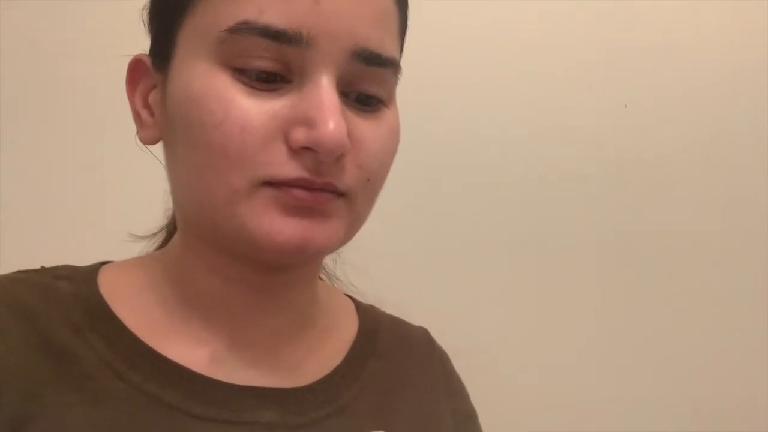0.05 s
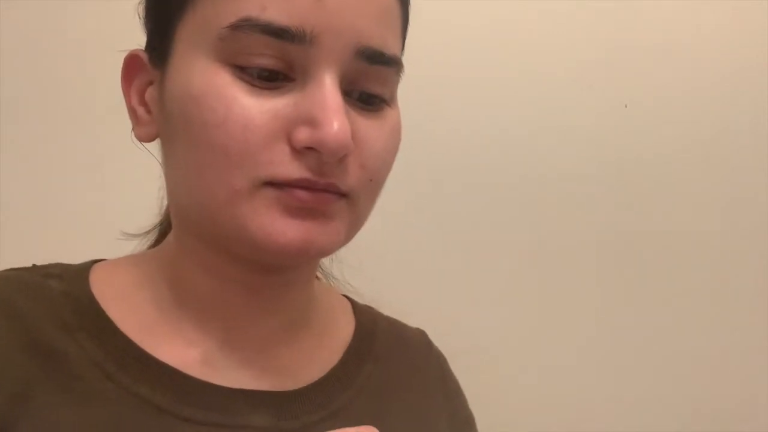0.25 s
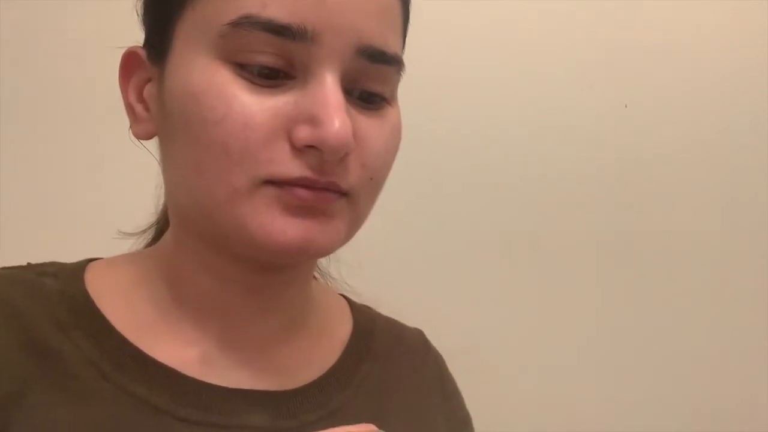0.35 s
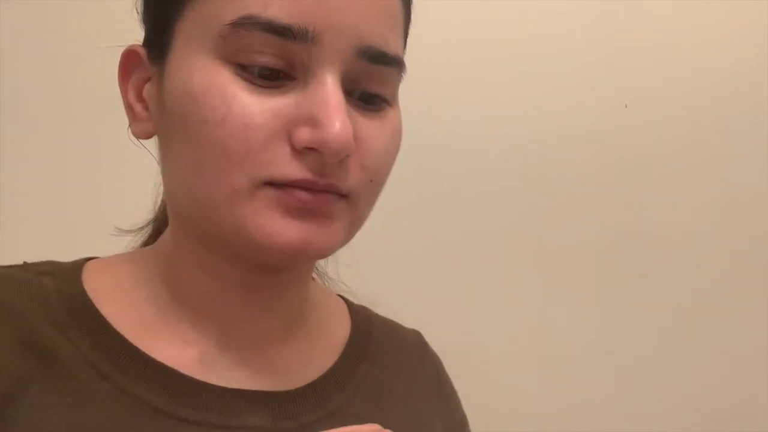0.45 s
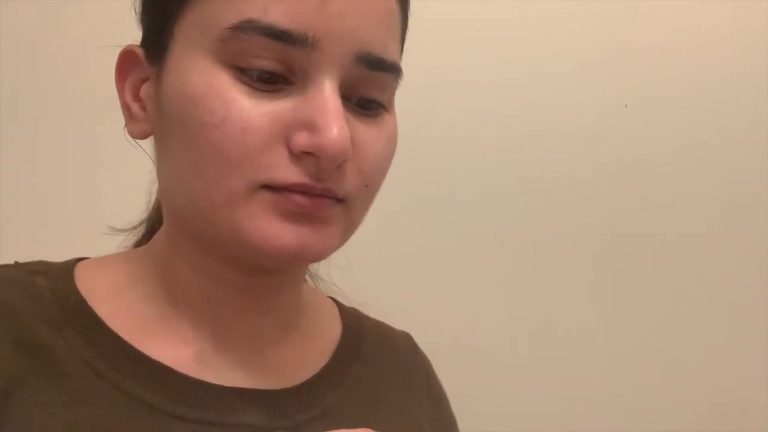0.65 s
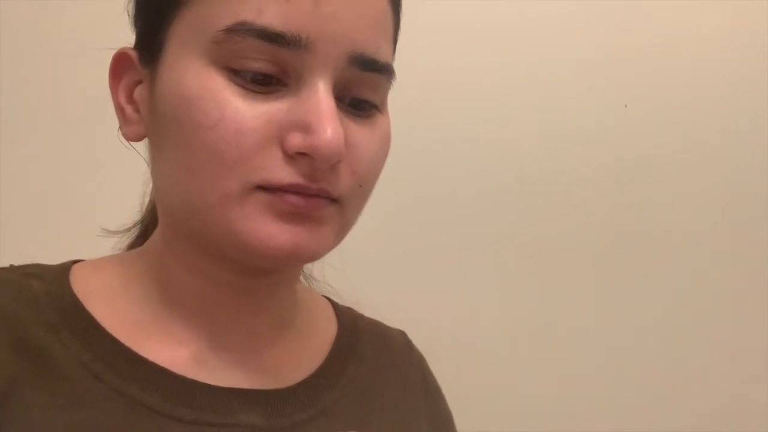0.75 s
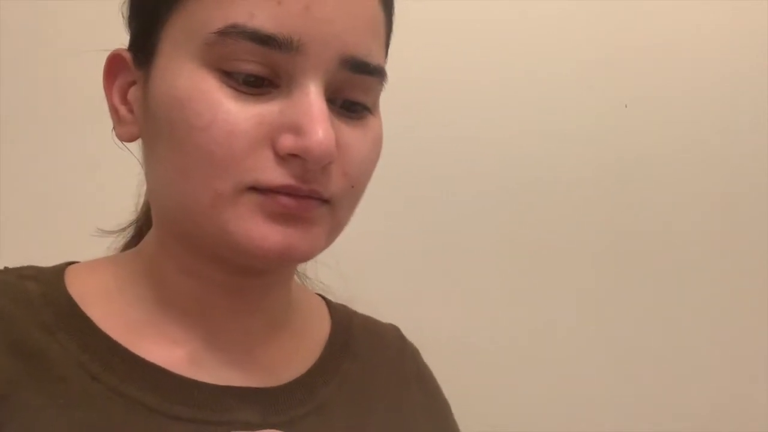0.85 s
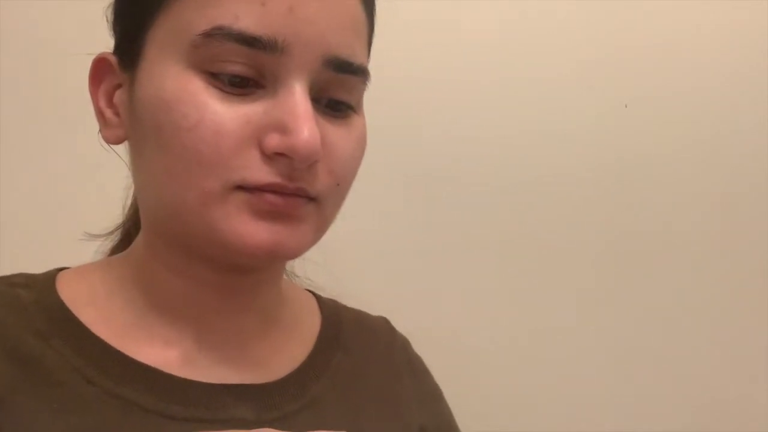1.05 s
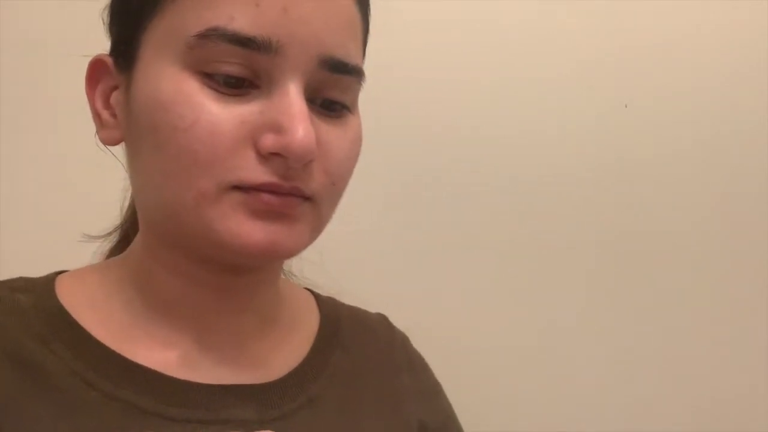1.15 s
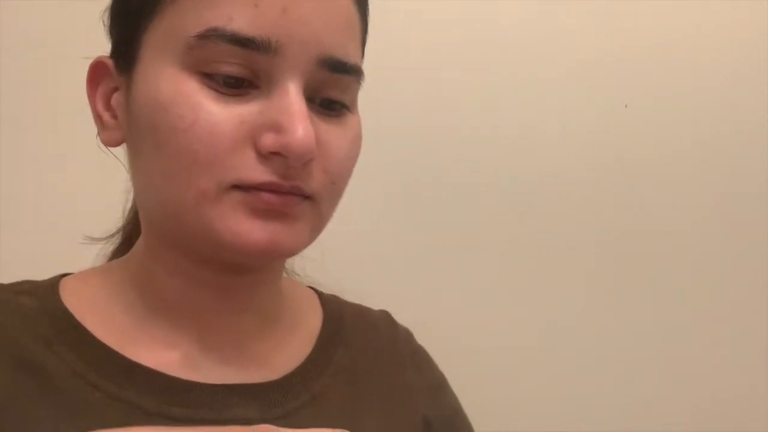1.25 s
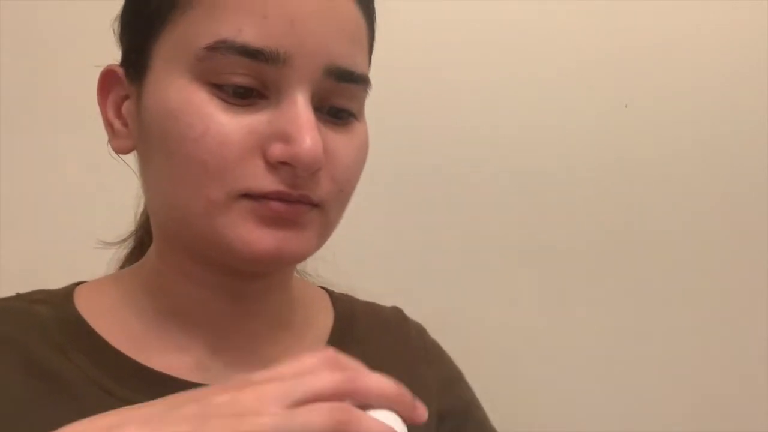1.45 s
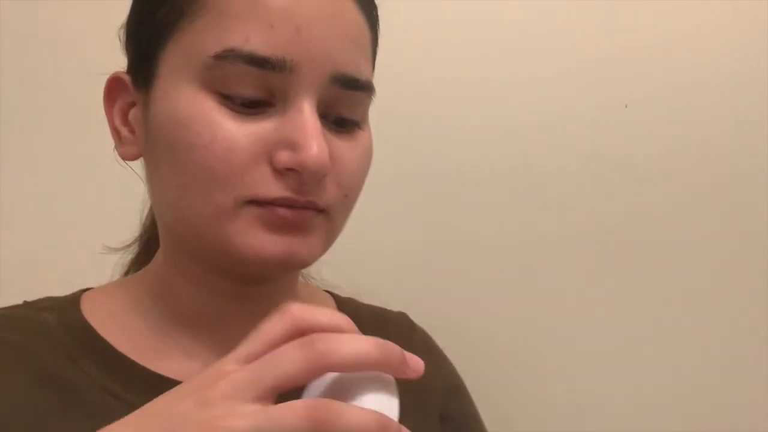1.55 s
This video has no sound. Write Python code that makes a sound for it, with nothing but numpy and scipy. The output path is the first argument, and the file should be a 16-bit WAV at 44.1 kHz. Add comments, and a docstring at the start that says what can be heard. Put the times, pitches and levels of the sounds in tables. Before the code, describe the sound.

A small jar's screw lid is handled close up in a small, quiet room. Faint scraping grows to clicks and a dull table bump around 0.25-0.32 s. Gritty thread scraping continues; a brighter click with a brief ring and low thud comes at 0.5 s. A finger hisses softly over the side around 0.75-0.95 s, then small dry clicks at 1.16-1.19 s fade into faint hum and hiss.

```python
"""The lid of a small cream jar clicks and scrapes on its thread, close to a phone in a small bare room.
Each click rings the modes (natural tones) of jar and lid; the scrape is a dense run of tiny slips.
The jar bumps a table top, which answers with low, short rings.
A finger slides over the smooth side, made of filtered noise; a low hum and hiss lie below."""
import sys
import numpy as np
from scipy import signal
from scipy.fft import rfft, irfft
from scipy.io import wavfile

SR = 44100
rng = np.random.default_rng(int(sys.argv[2]) if len(sys.argv) > 2 else 0)


def boost_factor(decibels):
    """Convert a level in decibels to a linear amplitude factor."""
    exponent = np.asarray(decibels, float) / 20
    return 10 ** exponent


def unload_audio(sound):
    """Save the sound as a 16-bit wav file, at the path given as the first command line argument."""
    columns = np.transpose(np.atleast_2d(sound))
    # keep every value between -1 and 1, then stretch to whole-number steps
    steps = np.round(np.clip(columns, -1, 1) * 32767)
    wavfile.write(sys.argv[1], SR, steps.astype(np.int16))


N = 70560  # samples: 1.6 s

# modes of jar and lid: pitch_hz, level_db (relative), t60_s (time to fade by 60 dB)
JAR_MODES = [(707, -9.5, 0.038), (889, -5, 0.034), (1198, 3, 0.016), (1316, -2.5, 0.029), (1620, 2.5, .005),
             (1944, 3, 0.0043), (2540, -2.5, 0.0032), (3836, 2.5, 0.0042), (4940, 2.5, 0.005),
             (5500, -1, 0.021), (6210, -3.5, 0.0068), (9070, -7, 0.0054), (12600, 3.5, 0.0024),
             (1103, -10, 0.48), (1140.6, -9.5, 0.43), (1267, -22, 0.39), (2043, -37, 0.066),
             (2552, -11, 0.16), (3373, -10, 0.21), (3460, -12, 0.17)]


def rms_one(x):
    """Scale a sound to an average (rms) strength of 1."""
    return x / np.sqrt(np.mean(x ** 2) + 1e-20)


def in_time(rows):
    """Turn a table whose first column is time into smooth curves, one value per sample."""
    time_s, *columns = np.transpose(rows)
    return [np.interp(np.arange(N) / SR, time_s, column) for column in columns]


def at_hz(points, hz):
    """Read a table at a pitch, on a log-frequency axis as the ear hears it."""
    table_hz, table_db = np.array(points).T
    return np.interp(np.log(hz), np.log(table_hz), table_db)


def colour(x, spectrum, turn=1):
    """Filter x by a curve in dB; turn=1j also shifts every wave by a quarter cycle."""
    hz = np.fft.rfftfreq(N, 1 / SR) + 1
    return irfft(turn * rfft(x) * boost_factor(at_hz(spectrum, hz)), N)


def drift(rate_hz):
    """Slow random wandering of spread 1: noise smoothed twice."""
    r = np.exp(-2 * np.pi * rate_hz / SR)
    noise = rng.standard_normal(N + SR)
    return rms_one(signal.lfilter([1], [1, -2 * r, r * r], noise)[SR:])


def ring(hits, hz, t60_s):
    """A resonator: a hit of size 1 starts a fading sine of height 1."""
    r = boost_factor(-60 / (max(t60_s, 0.001) * SR))
    w = 2 * np.pi * hz / SR
    return signal.lfilter([0, np.sin(w)], [1, -2 * r * np.cos(w), r * r], hits + 1e-18)


def lowpass(x, hz):
    """Soften everything above hz with a gentle second-order filter."""
    return signal.lfilter(*signal.butter(2, hz, fs=SR), x)


def bandpass(x, low_hz, high_hz):
    """Keep the range between two pitches."""
    return signal.sosfilt(signal.butter(2, [low_hz, high_hz], "band", fs=SR, output="sos"), x)


def lid_clicks():
    """Each click strikes every jar mode with its own colour and damping; low modes swell more slowly."""
    # clicks of lid on jar: start_s, grip_t60_s (longest ring the grip allows),
    # then one strength_db for each pitch in click_bands_hz
    click_rows = [(0.2519, 0.05, -13.5, -28, -20.5, -14.5, -31, -27.5, -14),
                  (0.2919, 0.075, -21, -27, -54, -67, -64, -70, -65),
                  (0.3164, 0.025, -5, -24, -9.5, -14, -24.5, -16, -11),
                  (0.5067, 0.045, -17.5, -46, -31, -32, -26, -44, -60),
                  (0.5112, 0.29, -11.5, -15.5, -2.5, -21.5, -17.5, -26.5, -11.5),
                  (0.5133, 0.095, -46, -12, -40, -50, -23, -29.5, -60),
                  (1.1565, 0.016, -21.5, -30.5, -45, -26, -59, -46, -77),
                  (1.1926, 0.017, -16.5, -22.5, -28, -34, -25.5, -24, -82)]
    # pitches at which the click strengths are given: pitch_hz
    click_bands_hz = [900, 1250, 2000, 2600, 3500, 5600, 12000]
    build_cycles, contact_s, build_share = 1.5, 0.00023, 0.033  # the longest of three build-up times counts
    waver_db, waver_hz = 1.5, 25  # long rings waver in the fingers
    out = np.zeros(N + SR)
    t = np.arange(SR // 2) / SR
    for start_s, grip_t60_s, *tone_db in click_rows:
        for hz, level_db, t60_s in JAR_MODES:
            build_s = max(build_cycles / hz, contact_s, build_share * min(t60_s, grip_t60_s))
            # damping by the grip adds to the mode's own
            fade = boost_factor(-60 * t * (1 / t60_s + 1 / max(grip_t60_s, 0.005)))
            envelope = np.minimum(t / build_s, 1) * fade
            waver = waver_db * drift(waver_hz)[:len(t)] * np.minimum(t * waver_hz, 1) * (t60_s > 0.1)
            strike_db = np.interp(np.log(hz), np.log(click_bands_hz), tone_db)
            strength = boost_factor(level_db + waver + strike_db)
            # random starting point in the cycle, more so for high modes
            phase_cycles = rng.normal(0, 1) / 10 * np.sqrt(hz / 1500)
            tone = np.sin(2 * np.pi * (hz * t + phase_cycles))
            out[int(start_s * SR):][:len(t)] += strength * envelope * tone
    return out[:N]


def thread():
    """Dense uneven slips sound the hollow under the lid and the jar's modes; a rumble passes into the hand."""
    # lid on thread: time_s, scrape_db, bright_db, rumble_db
    turn_rows = [(0, -118, -81, -65.5), (.07, -58.5, -67.5, -57), (.15, -47, -57, -51.5),
                 (.21, -49.5, -54, -55), (.27, -39, -45.5, -47.5), (.34, -42.5, -39, -40.5),
                 (.4, -43, -47, -46), (.45, -44.5, -66, -41.5), (.49, -47, -47.5, -43.5),
                 (.6, -43, -41, -43), (.68, -49, -92, -64.5), (.75, -57.5, -77, -49.5),
                 (.82, -52, -91, -46.5), (.9, -49, -50, -54), (.97, -58.5, -51.5, -56),
                 (1.1, -54.5, -53.5, -51.5), (1.14, -55, -57.5, -55), (1.165, -46, -42.5, -41.5),
                 (1.19, -95, -48.5, -45), (1.25, -91, -51.5, -50.5), (1.31, -66, -73, -62),
                 (1.6, -64.5, -83, -62.5)]
    # pitch of the hollow under the lid: time_s, pitch_hz
    hollow_rows = [(0, 1330), (.1, 1340), (.17, 1250), (.25, 1205), (.35, 1000), (.45, 1180), (.65, 1095),
                   (.95, 1260), (1.12, 1360), (1.17, 1090), (1.3, 1330), (1.6, 1340)]
    slips_per_s, slip_spread_db = 2800, 3
    hollow_half_width_hz, dull_hz = 253, 2100
    rubbed_t60_s, rubbed_ring_db = 0.019, -12.5  # longest bright ring; low rings against the hollow
    scrape_db, bright_db, rumble_db = in_time(turn_rows)

    sizes = boost_factor(slip_spread_db * np.minimum(rng.exponential(1, N), 4)) * rng.choice([-1, 1], N)
    slips = sizes * (rng.random(N) < slips_per_s / SR)

    # shift the moving pitch down to zero, smooth there, and shift it back
    spin = np.exp(2j * np.pi * np.cumsum(in_time(hollow_rows)[0]) / SR)
    hollow = (lowpass(slips / spin, hollow_half_width_hz) * spin).real

    bright, low_rings = 0, 0
    for hz, level_db, t60_s in JAR_MODES:
        if hz > dull_hz:
            bright = bright + boost_factor(level_db) * ring(slips, hz, min(t60_s, rubbed_t60_s))
        if 1000 < hz < 1500 and t60_s > 0.1:
            low_rings = low_rings + boost_factor(level_db) * ring(slips, hz, t60_s)
    bright = lowpass(bright, dull_hz)
    scrape = rms_one(hollow) + boost_factor(rubbed_ring_db) * rms_one(low_rings)
    rumble = bandpass(rng.standard_normal(N), 280, 900)
    out = boost_factor(scrape_db) * rms_one(scrape)
    out = out + boost_factor(bright_db) * rms_one(bright)
    return out + boost_factor(rumble_db) * rms_one(rumble)


def bumps():
    """Soft blows set the table top's modes ringing; the soft contact dulls them."""
    # bumps on the table: start_s, level_db, deep_db (extra for the deepest modes)
    bump_rows = [(0.228, -37, -4), (0.2339, -28, -20), (0.2395, -27, -28), (0.2434, -25, -28),
                 (.255, -22.5, -0.5), (.265, -17, -28), (0.451, -35, 2), (0.477, -39.5, 17.5),
                 (0.491, -36.5, 13.5), (0.499, -29.5, 21.5), (0.525, -32.5, 1), (0.801, -39.5, -37)]
    # modes of the table top: pitch_hz, level_db (relative), t60_s
    table_modes = [(78.9, -9.5, 0.26), (182.5, -7, 0.071), (259, -2, 0.055), (341.7, -6, 0.094),
                   (424, -3.5, 0.068), (694, -17, 0.076)]
    deep_hz, contact_hz, cut_hz = 200, 544, 60
    start_s, bump_db, deep_db = np.transpose(bump_rows)
    out = 0
    for hz, level_db, t60_s in table_modes:
        chance_db = rng.normal(0, 1, len(start_s))
        blows = np.zeros(N)
        blows[(start_s * SR).astype(int)] = boost_factor(bump_db + level_db + deep_db * (hz < deep_hz) + chance_db)
        out = out + ring(blows, hz, t60_s)
    no_sub_bass = signal.butter(4, cut_hz, "high", fs=SR, output="sos")
    return -signal.sosfilt(no_sub_bass, lowpass(out, contact_hz))


def noise_pair(mid, side, side_db):
    """Unrelated noise for sum and difference of the channels, each of rms 1 before side_db."""
    mid_noise = rms_one(colour(rng.standard_normal(N), mid))
    side_noise = rms_one(colour(rng.standard_normal(N), side))
    return np.array([mid_noise, boost_factor(side_db) * side_noise])


def finger():
    """Smooth skin hiss follows the slide; its treble rises and falls further than the rest."""
    # finger on the jar's side: time_s, level_db
    slide_rows = [(0, -56), (.1, -63.5), (.2, -60), (.26, -49.5), (.4, -62), (.5, -51.5), (.58, -49.5),
                  (.64, -62.5), (.69, -60.5), (.74, -51), (.79, -44), (.83, -42), (.865, -44.5), (.9, -44),
                  (.95, -50), (1.0, -64), (1.1, -60.5), (1.2, -51.5), (1.3, -66.5), (1.45, -66.5),
                  (1.6, -67.5)]
    # colour of the hiss in the channel sum: pitch_hz, level_db (relative)
    slide_mid = [(150, -41), (300, -10), (600, -21.5), (2500, -3.5), (5700, -3), (7400, -7), (8300, -21.5),
                 (9700, -34), (10400, -14.5), (13000, -12.5), (15600, -13.5), (16000, -50)]
    # colour of the hiss in the channel difference: pitch_hz, level_db (relative)
    slide_side = [(150, -6), (450, -20), (950, 2.5), (1750, -8.5), (5000, -6), (9000, -5), (12000, -17),
                  (13200, -49), (16400, -80)]
    # the treble is unchanged when the slide is at even_db
    treble_hz, treble_gain_per_db, even_db = 9250, 0.83, -50
    slide_db, = in_time(slide_rows)
    hiss = noise_pair(slide_mid, slide_side, side_db=3)
    low = signal.sosfiltfilt(signal.butter(4, treble_hz, "low", fs=SR, output="sos"), hiss)
    high = signal.sosfiltfilt(signal.butter(4, treble_hz, "high", fs=SR, output="sos"), hiss)
    treble_gain = boost_factor(treble_gain_per_db * (slide_db - even_db))
    flutter_db = drift(23.0)  # spread 1 dB
    return boost_factor(slide_db + flutter_db) * (low + treble_gain * high)


def room(x):
    """Direct sound plus a diffuse tail that fades by band, then the microphones' colour."""
    # fading time of the room: pitch_hz, t60_s
    room_fade = [(100, 0.49), (1000, 0.23), (4000, 0.23), (12000, 0.034)]
    # microphone colour of the channel sum, which cancels near 9 kHz: pitch_hz, gain_db
    mic_mid = [(100, -3), (6500, -1.5), (7600, -7), (8300, -12), (9800, -34), (10500, -13), (12000, -24.5),
               (16000, -18)]
    # microphone colour of the channel difference: pitch_hz, gain_db
    mic_side = [(70, -14.5), (250, -10), (600, -2), (1200, -4.5), (2500, -5), (5500, 1.5), (9000, -11),
                (12000, -33), (16000, -26)]
    tail_db, first_echo_s = -5.5, 0.0041
    t = np.arange(SR // 2) / SR
    edges_hz = 110 * 2 ** np.arange(0, 9)  # octave bands
    tails = 0
    for low_hz, high_hz in zip(edges_hz[:-1], np.minimum(edges_hz[1:], 18000)):
        # separate noise for sum and difference
        band = bandpass(rng.standard_normal((2, len(t))), low_hz, high_hz)
        t60_s = at_hz(room_fade, np.sqrt(low_hz * high_hz))
        # the division evens out the energy of long and short tails
        tails = tails + band * boost_factor(-60 * t / t60_s) / np.sqrt(t60_s * SR / 14)
    tails = tails * np.clip(t / first_echo_s - 1, 0, 1) * boost_factor(tail_db)
    mid, side = x + signal.fftconvolve(x[None], tails, axes=1)[:, :N]
    return np.array([colour(mid, mic_mid), colour(side, mic_side, turn=1j)])


def background():
    """Steady coloured hiss, and a hum that wavers because noise drives a narrow resonance."""
    # colour of the hiss in the channel sum: pitch_hz, level_db (relative)
    hiss_mid = [(20, -62), (75, 8.5), (110, -10.5), (250, -10), (600, -47), (1350, -27), (2500, -21),
                (7400, -59), (8300, -38.5), (9800, -87), (10500, -31), (14500, -26.5), (15600, -31),
                (16000, -70)]
    # colour of the hiss in the channel difference: pitch_hz, level_db (relative)
    hiss_side = [(20, -58), (86, 1.5), (147, -5), (500, -16), (900, -31), (1500, -47), (3000, -24),
                 (6000, -57), (12000, -24.5), (13000, -43), (16400, -66)]
    hiss_db, hiss_side_db = -56, -58
    hum_hz, hum_width_hz, hum_db = 75, 9.9, -57
    hum_t60_s = np.log(1000) / np.pi / hum_width_hz
    hum = rms_one(ring(rng.standard_normal(N + SR), hum_hz, hum_t60_s)[SR:])
    hiss = boost_factor(hiss_db) * noise_pair(hiss_mid, hiss_side, side_db=hiss_side_db - hiss_db)
    return hiss + boost_factor(hum_db) * hum * boost_factor([[0], [-9]])  # hum is 9 dB weaker in the difference


def scene():
    """All sources as sum and difference of the channels, then left and right."""
    left_db = -1.2  # left against right
    handling = room(lid_clicks() + thread() + bumps())
    mid, side = handling + finger() + background()
    left = boost_factor(left_db / 2) * (mid + side)
    right = boost_factor(-left_db / 2) * (mid - side)
    return np.array([left, right])


def roll_off(x):
    """The treble ends steeply here."""
    return signal.sosfilt(signal.butter(12, 16510, fs=SR, output="sos"), x)


def record(dry):
    """A steep filter cuts the top: 30 dB down from 16400 Hz upward."""
    top_cut = signal.cheby2(8, 30, 16400, fs=SR, output="sos")
    mix = signal.sosfilt(top_cut, dry)
    return roll_off(mix)


dry = scene()
out = record(dry)
unload_audio(out)
```